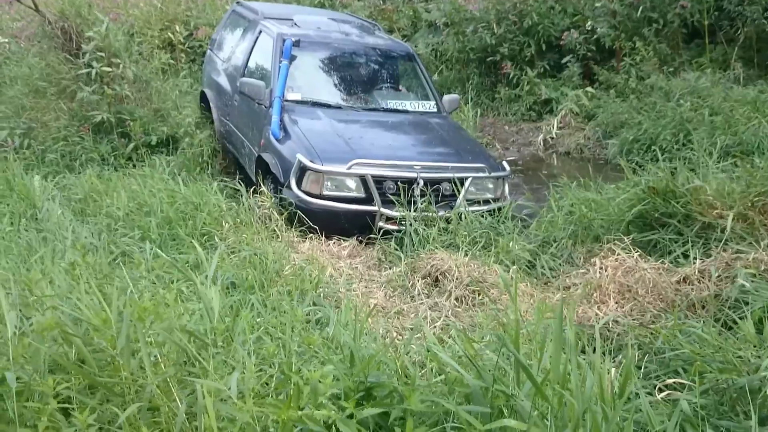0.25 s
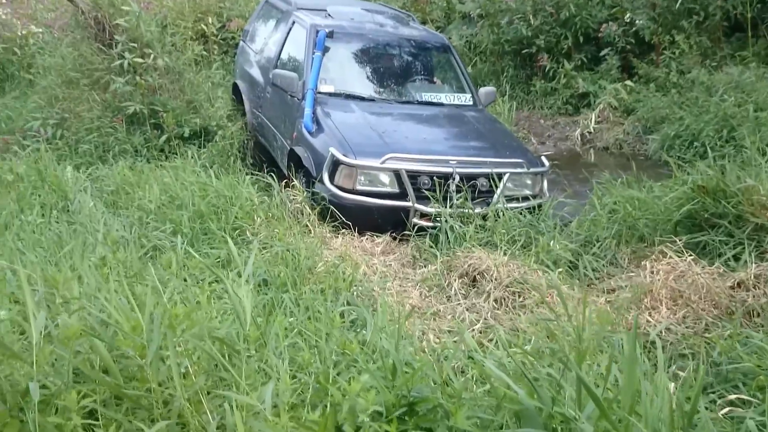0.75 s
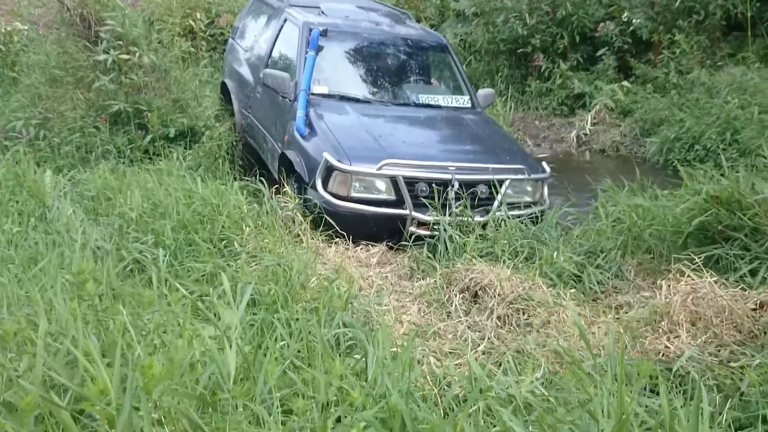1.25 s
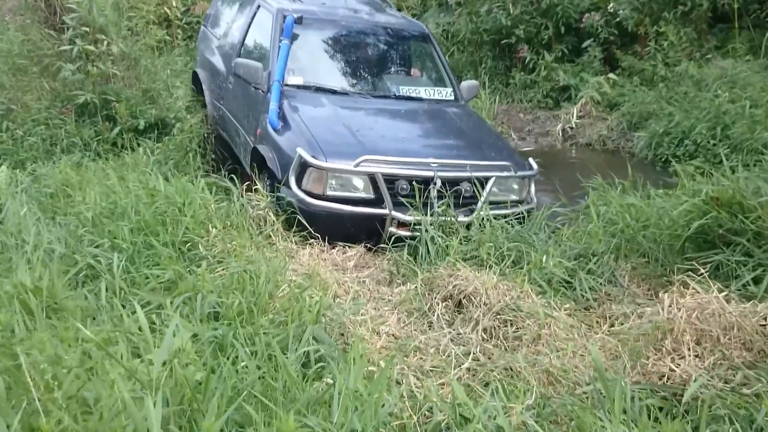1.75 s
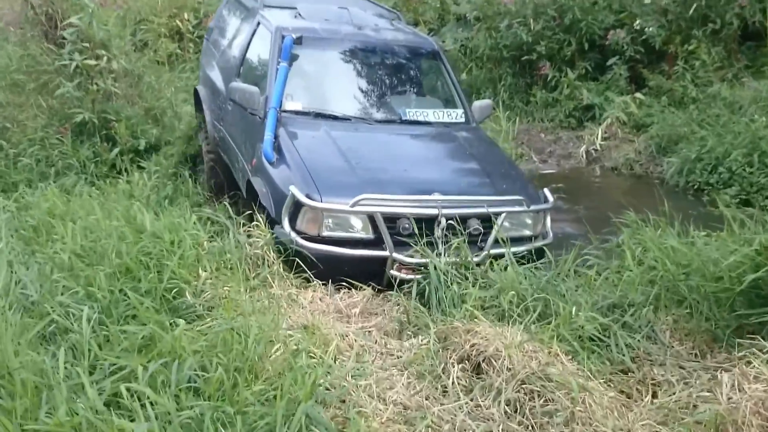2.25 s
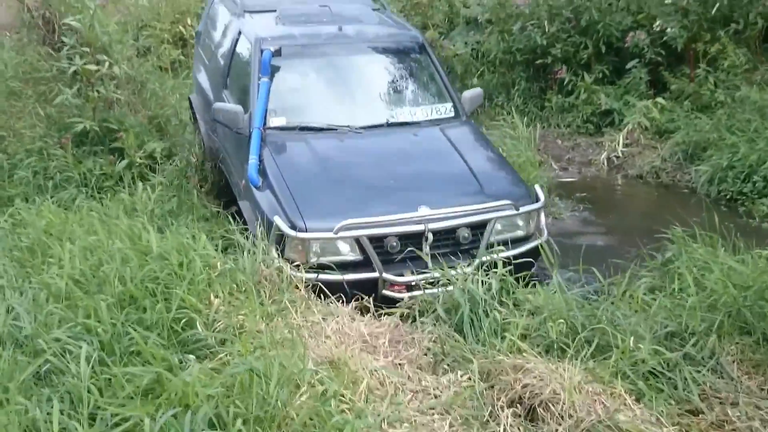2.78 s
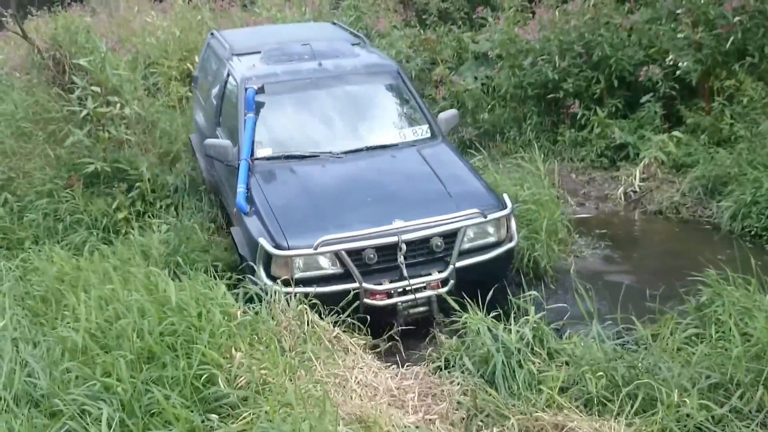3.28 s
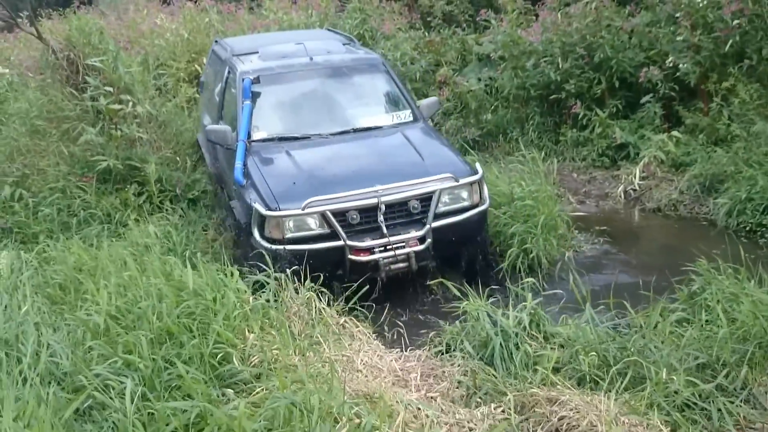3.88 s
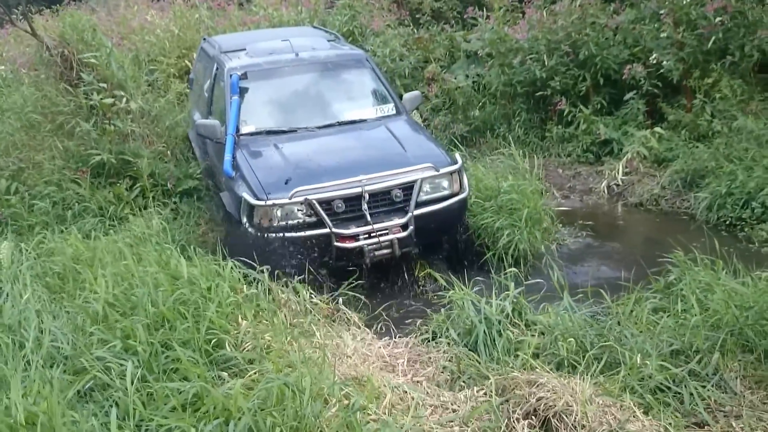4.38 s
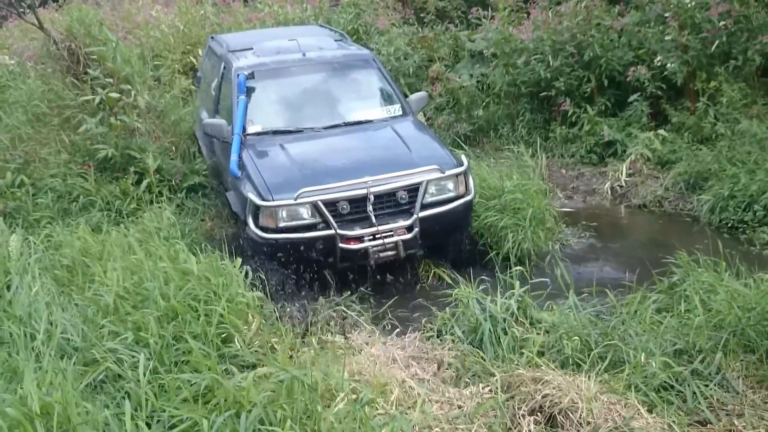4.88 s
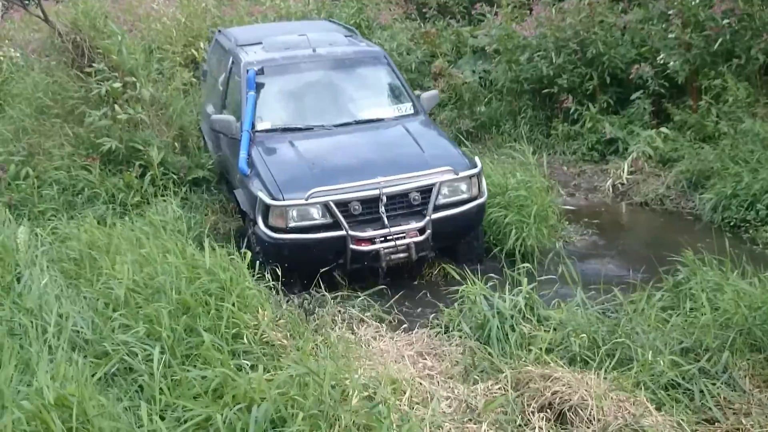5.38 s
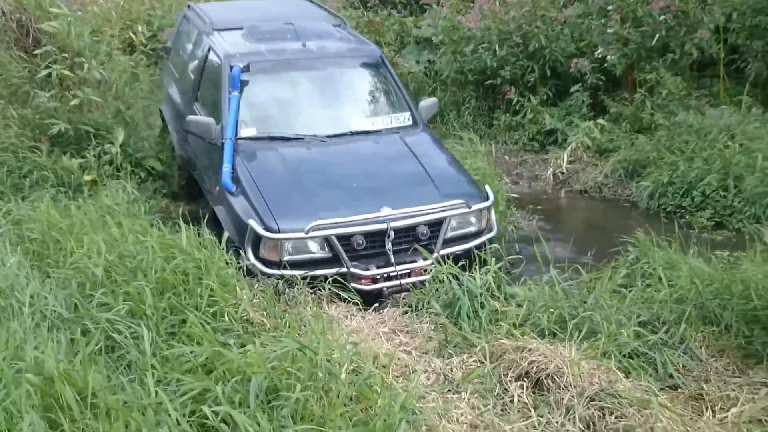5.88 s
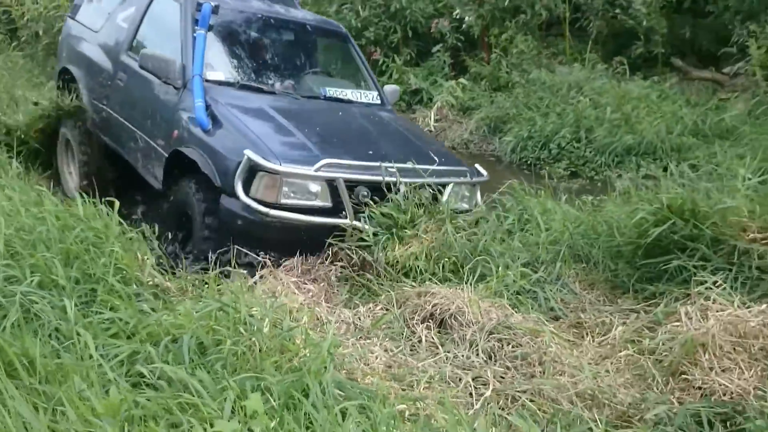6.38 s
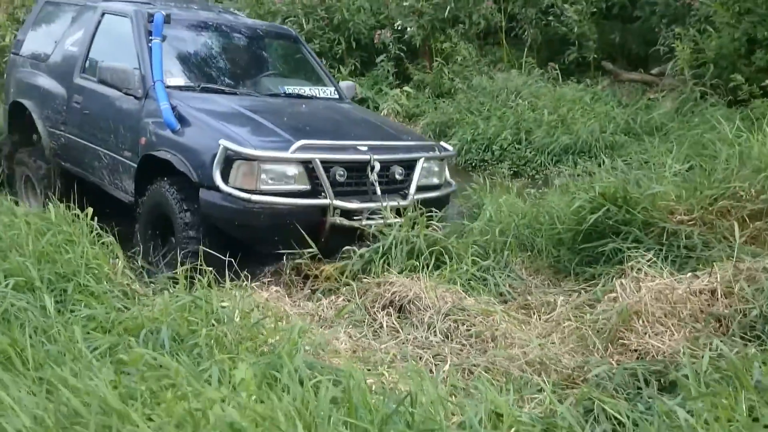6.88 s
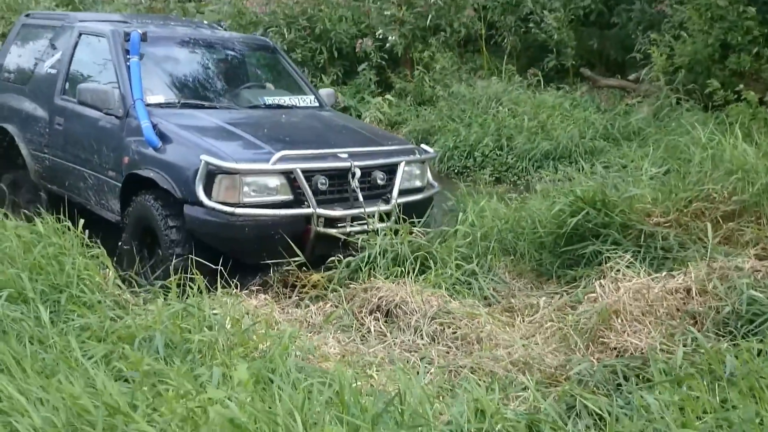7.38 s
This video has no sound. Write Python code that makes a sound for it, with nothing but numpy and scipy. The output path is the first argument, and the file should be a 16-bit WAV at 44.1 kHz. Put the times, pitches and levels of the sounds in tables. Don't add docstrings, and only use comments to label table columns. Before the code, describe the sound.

In tall grass by a muddy ditch, small stereo microphones catch a car struggling free. Its burbling engine drops to idle, pulls away with deep intake growl, surges to a rough roar, sags and rises again without stopping. Fan hum and a steady belt whine join valve clatter under the bonnet. Bursts of watery hiss and mud spatter come from the wheels, with a heavy bump midway, small clicks and brief low wind gusts.

```python
import sys
import numpy as np
from scipy import signal
from scipy.io import wavfile
from scipy.ndimage import uniform_filter1d

SR = 44100
rng = np.random.default_rng(int(sys.argv[2]) if len(sys.argv) > 2 else 0)


def store_pcm(level_fs):
    pcm = np.round(np.clip(level_fs, -1, 1) * 32767).astype(np.int16)
    wavfile.write(sys.argv[1], SR, np.atleast_2d(pcm).T)


def natural_amplitude(level_db):
    exponent = np.asarray(level_db, float) / 20
    return 10 ** exponent


N = 337365
T = np.arange(N) / SR

# (time [s], firing rate [Hz])
ENGINE = [(0.0, 67.7), (0.55, 49.36), (0.85, 40.68), (1.23, 32.14), (1.6, 29.96), (2.28, 55.65),
          (2.56, 59.27), (2.88, 58.75), (4.05, 121.8), (4.2, 136.5), (4.39, 106.8), (4.67, 83.46),
          (5.09, 66.96), (5.35, 88.33), (5.95, 88.4), (6.24, 108.8), (6.6, 111.6), (7.65, 161)]
# (time [s], throttle as firing tone [dB], bark of the overtones [dB], bay roar [dB])
LOAD = [(0.0, -40.5, 4.5, -45), (.3, -37.5, -4, -51), (.85, -39.5, -7.5, -59), (1.2, -52.5, 4, -65),
        (1.6, -53, 2.5, -63.5), (1.8, -38.5, -0.5, -53), (2.06, -28.5, -2.3, -48.5), (2.3, -31, -3.5, -48),
        (2.95, -33, -1, -43), (3.94, -36, 1.5, -31.5), (4.28, -41, -2, -31), (4.42, -36, -1, -33),
        (5.1, -40.5, -2, -44), (5.5, -35, -5, -36.5), (6.0, -35.5, -2, -37), (6.9, -30, -3.5, -31.5),
        (7.35, -22, -9, -29.5), (7.65, -26.5, 5.5, -27.5)]
# (time [s], nearness [0-1])
NEARNESS = [(0, 0.17), (1.5, 0), (2.4, 0.57), (3.3, 1), (7.65, 0.72)]
# (frequency [Hz], likeness [0-1], left-right level [dB], left's extra phase lead [rad])
PORTS = [(24.9, 0.14, -23, -0.74), (60, 0.75, -14, 0.83), (220, 0.98, -1, 0.23), (440, .75, -5.5, 0.66),
         (616, 0.94, 5.5, -0.031), (925, 1, -5, 0.4), (1160, 0.83, 4.5, 0.81), (2340, 0.93, 3, 0.4),
         (2660, 0.55, -3.5, -0.83), (2830, 0.03, -6, -0.5), (4220, 0.47, -2.5, 0.18),
         (5500, 0.2, 10.5, 0.88), (6800, 0.2, 19.5, 0.67), (14600, 0, 9, 0.23)]
MID_ROAR_DB, MID_THROTTLE_DB = -40, -34


def evened(x):
    return x / np.sqrt(np.mean(np.abs(x) ** 2) + 1e-20)


def read(points, hz, index=1):
    points = np.array(points)
    return np.interp(np.log(hz + 1), np.log(points[:, 0] + 1), points[:, index])


def column(rows, index, t=T, **ends):
    rows = np.array(rows)
    return np.interp(t, rows[:, 0], rows[:, index], **ends)


def to_db(gain):
    return 20 * np.log10(gain + 1e-9)


def with_roar(db, share):
    return db + share * (column(LOAD, index=3) - MID_ROAR_DB)


def drift(rate_hz):
    knots = evened(uniform_filter1d(rng.standard_normal(4000), size=3))
    return np.interp(T * rate_hz * 3, np.arange(4000), knots)


def burst(start, held, db, rise_db_per_s, fall_db_per_s):
    t = T[::32]
    before = np.maximum(start - t, 0)
    after = np.maximum(t - start - held, 0)
    gain = natural_amplitude(db - rise_db_per_s * before - fall_db_per_s * after)
    return np.repeat(gain, 32)[:N]


def lead(hz, t):
    # (time [s], left's lead [s])
    left_lead = [(0, 0.00002), (2, 0.000034), (4, 0.000085), (7.65, 0.0001)]
    return 2 * np.pi * hz * column(left_lead, index=1, t=t) + read(PORTS, hz, index=3)


def tone(hz, level_db, wobble_db, wobble_hz, stray, lag=0):
    angle = 2 * np.pi * (np.cumsum(hz) / SR + stray * drift(wobble_hz)) - lag
    gap = np.repeat(lead(hz[::64], T[::64]), 64)[:N]
    gain = np.sqrt(2) * natural_amplitude(level_db + wobble_db * drift(wobble_hz))
    return gain * np.cos([angle, angle - gap])


def haze(colour, level_db, size, patchy_db, flicker_db, tilt=1, far=None):
    hop = size // 4
    frames, hz = N // hop + 5, np.fft.rfftfreq(size, 1 / SR)[:, None]
    t = np.arange(frames) * hop / SR
    a, b, c, d, patches = rng.standard_normal((frames, len(hz), 5)).T
    patches = uniform_filter1d(patches, size=6, axis=0)
    patches = evened(uniform_filter1d(patches, size=8, axis=1))
    flicker = evened(uniform_filter1d(rng.standard_normal(frames), size=4))
    same = np.clip(read(PORTS, hz), 0, 1)
    left = a + 1j * b
    right = same * left * np.exp(-1j * lead(hz, t)) + np.sqrt(1 - same ** 2) * (c + 1j * d)
    side = natural_amplitude(tilt * read(PORTS, hz, index=2) / 2)
    near = np.clip(column(NEARNESS, index=1, t=t), 0, 1)
    colour_db = near * read(colour, hz) + (1 - near) * read(far or colour, hz)
    gain = natural_amplitude(colour_db + patchy_db * patches + flicker_db * flicker)
    z = np.array([left * side, right / side]) * gain / (side + 1 / side)
    noise = signal.istft(z, nperseg=size, noverlap=size - hop)[1][:, :N]
    return natural_amplitude(level_db) * evened(noise)


def firing_orders():
    # (frequency [Hz], level [dB])
    duct = [(55, -2.2), (105, 2), (150, 3), (195, 7.5), (240, -2.2), (275, -13), (350, -7.5), (470, -11.5)]
    # (frequency [Hz], level [dB])
    pipe = [(30, -22), (80, -17), (120, 5.5), (200, -5), (250, -3.5), (340, -8), (450, -18), (550, -16),
            (700, -20)]
    # (multiple of the firing rate, level from the fourth overtone [dB])
    upper = [(4, 0.5), (5, -6.5), (6, -7.5), (7, -22)]
    # (multiple of the firing rate, level from the uneven-cylinder layer [dB])
    halves = [(.5, -13), (1.5, -1.5), (2.5, -0.5), (3.5, -7.5), (4.5, -7.5)]
    hz, throttle = column(ENGINE, index=1), column(LOAD, index=1)
    bark = throttle + column(LOAD, index=2)
    uneven = with_roar(-47, 0.69) + 0.45 * np.maximum(hz - 132, 0)
    slowing = np.clip(-uniform_filter1d(np.gradient(np.log(hz)) * SR, size=4000), 0, 1)
    overrun_db = -14 * slowing
    lag = 2.0
    out = tone(hz, throttle + read(duct, hz), 1.2, 12, 0.008, lag)
    out += tone(2 * hz, bark - 6.5 + read(duct, 2 * hz), 2.5, 7, 0.045, lag)
    out += tone(3 * hz, bark - 8 + read(duct, 3 * hz), 2, 7, 0.06, lag)
    for k, db in upper:
        out += tone(k * hz, bark - 11 + db + overrun_db + read(duct, k * hz), 3, 8, 0.045, lag)
    for k, db in halves:
        out += tone(k * hz, uneven + db + read(pipe, k * hz), 2, 5, 0.028, lag)
    off = (4 * hz - 555) / 50
    ring_db = column(LOAD, index=3) - 10 - 10 * np.log10(1 + off ** 4)
    return out + tone(4 * hz, ring_db, 2, 8, 0.03)


def burble():
    # (frequency [Hz], level per Hz [dB])
    near_colour = [(15, -30), (25, 1), (48, -15.5), (97, 5), (188, 3.5), (243, 1), (393, -9), (476, -24),
                   (520, -22.5), (680, -37), (1140, -120)]
    far_colour = [(15, -36), (25, -1), (59, -20), (181, -6.5), (234, -4.5), (321, -22.5), (414, -19.5),
                  (520, -27), (680, -61), (1140, -120)]
    hz, throttle = column(ENGINE, index=1), column(LOAD, index=1)
    puffs = np.exp(np.clip(35 / hz, 0, 1) * np.cos(2 * np.pi * np.cumsum(hz) / SR))
    burble_db = with_roar(-26.5, 0.45) + 0.29 * (throttle - MID_THROTTLE_DB)
    noise = haze(near_colour, burble_db - 9.5, size=2048, patchy_db=-1.5, flicker_db=0.5, tilt=0,
                 far=far_colour)
    return noise * evened(puffs)


def whine(start, held, hz, glide_hz_per_s, db):
    gain = burst(start, held, db, 85, 85)
    pitch = hz + glide_hz_per_s * np.clip(T - start, -0.4, held + 0.4)
    return gain * tone(pitch, 0, 3.5, 60, 0.12 + hz / 15000)


def thrown(index):
    # (start [s], held [s], spray [dB], coarse mud [dB], onset [dB/s])
    splashes = [(.72, .3, -63.5, -80, 150), (1.17, .1, -47.5, -70, 61), (1.601, 0.25, -39.5, -56, 148),
                (2.1, 0.22, -49, -51.5, 60), (2.36, .08, -44, -49, 120), (2.52, 0.19, -39.5, -43.5, 64),
                (2.9, .2, -49, -48, 53), (3.6, 0.059, -48, -40.5, 68), (3.8, .66, -58.5, -47.5, 56),
                (4.9, 0.13, -47.5, -43.5, 27), (5.16, .02, -53, -63, 84), (5.56, 0.049, -46, -43, 23),
                (6.08, 0.096, -43.5, -40, 50), (6.58, 0.082, -46, -42, 24), (6.8, 0.07, -44.5, -65, 63),
                (7.05, 0.56, -46.5, -48, 40)]
    power = sum(burst(row[0], row[1], row[index], row[4], 75) ** 2 for row in splashes)
    return power ** 0.5


def engine_bay():
    # (frequency [Hz], level per Hz [dB])
    near_roar = [(330, -14), (420, -7.5), (490, -27), (580, -9), (780, 0), (950, -1), (1140, -13.5),
                 (1480, -8.5), (1660, -5.5), (1850, -13), (2550, -13), (2850, -22), (3800, -16.5),
                 (5200, -38)]
    far_roar = [(260, -38), (350, -18.5), (640, 1), (800, -2.5), (1000, -7), (1420, -2), (1760, -8.5),
                (2200, -1.5), (2480, -13.5), (2760, -7), (3050, -16), (5200, -39)]
    # (frequency [Hz], level per Hz [dB])
    near_clatter = [(1940, -7.5), (3300, -6), (3600, -7.5), (3950, -3.5), (5910, -4), (6330, -4.5),
                    (7770, -18.5), (9000, -20.5), (11700, -26.5), (19800, -120)]
    far_clatter = [(1940, -8.5), (3000, -12), (4300, -8.5), (5200, -4), (5750, -3.5), (6500, -9.5),
                   (8000, -19), (13200, -22.5), (14100, -50)]
    # (start [s], held [s], pitch [Hz], glide [Hz/s], level [dB])
    whines = [(.15, 0.052, 2290, -750, -51.5), (2.44, .15, 2190, 300.5, -51), (4.4, 0.18, 2500, 39, -53),
              (.9, .08, 1285, -500, -66), (1.1, .5, 825, -170, -64), (3.05, 0.059, 2565, 898.5, -53),
              (6.15, 1.8, 1651, 15, -44.5), (1.7, .45, 2125, 88, -61.5), (.4, .3, 2080, -100, -61)]
    hz = column(ENGINE, index=1)
    beat = 1 + np.clip(9 / hz, 0, 1) * np.cos(2 * np.pi * np.cumsum(hz) / SR)
    roar = haze(near_roar, column(LOAD, index=3) + 1.7, size=1024, patchy_db=1.48, flicker_db=0.5,
                far=far_roar)
    clatter_db = to_db(np.hypot(natural_amplitude(with_roar(-42.5, 0.99)), thrown(index=3)))
    clatter = haze(near_clatter, clatter_db + 3.0, size=512, patchy_db=1.24, flicker_db=0.5,
                   far=far_clatter)
    voices = whines + 2 * whines[:2]
    return beat * (roar + clatter) + sum(whine(*row) for row in voices)


def spray():
    # (frequency [Hz], level per Hz [dB])
    near_hiss = [(1500, -10), (2500, -7), (3000, -3), (3900, -10), (6300, -6), (7900, -5.5), (9500, -5.5),
                 (11200, -7), (13500, -0.5), (14900, -5), (16500, -5.5)]
    far_hiss = [(1500, -13), (3000, -6.5), (3900, -11), (6300, -8), (8100, -2), (9800, -6.5), (11200, -9),
                (13500, -5.5), (16500, -10)]
    drops = natural_amplitude(2.1 * np.minimum(rng.exponential(1, N), 5))
    drops = drops * (rng.random(N) < 150 / SR)
    grain = 1 + 0.17 * signal.oaconvolve(drops, np.exp(-np.arange(200) / 40))[:N]
    mist_db = with_roar(-53.5, 1) - 14 * (1 - column(NEARNESS, index=1))
    hiss_db = to_db(np.hypot(natural_amplitude(mist_db), thrown(index=2)))
    return grain * haze(near_hiss, hiss_db + 1.43, size=256, patchy_db=0.8, flicker_db=0.64, tilt=0.44,
                        far=far_hiss)


def wind():
    # (frequency [Hz], level per Hz [dB])
    rumble = [(2, -12), (10, 1), (25, -11), (60, -11.5), (150, -14), (300, -86)]
    # (start [s], held [s], level [dB])
    gusts = [(0.0, 0.025, -35.5), (.23, .5, -42), (1.87, 0.051, -30), (2.76, .05, -33.5), (3.3, 0.11, -37),
             (3.57, 0.035, -41), (3.87, 0.052, -31.5), (5.0, .08, -34), (5.95, .05, -38),
             (6.65, .04, -30.5), (6.9, 0.092, -44), (7.58, 0.048, -44)]
    gain = natural_amplitude(-46) + sum(burst(*row, 79, 86) for row in gusts)
    return haze(rumble, to_db(gain), size=4096, patchy_db=1.5, flicker_db=1.0, tilt=1.0)


def ticks():
    # (time [s], level [dB], left-right level [dB])
    stalks = [(.0448, -51, 7.5), (0.6937, -24, 21), (0.963, -46, 2.5), (2.0518, -39, -4), (3.1124, -32, 15),
              (5.1427, -33, 5), (6.8054, -25, 4.5), (7.0708, -27, 6)]
    out, t = np.zeros((2, N + 8000)), np.arange(400) / SR
    bright = signal.butter(2, [5000, 14500], "band", fs=SR)
    body = 0.39 * np.sin(2 * np.pi * 900 * t) * np.exp(-t / 0.00091)
    for s, db, pan in stalks:
        snap = rng.standard_normal(400) * np.exp(-t / 0.00026)
        tick = signal.lfilter(*bright, snap) + 0.12 * snap
        tick = natural_amplitude([[0], [-pan]]) * tick / abs(tick).max()
        out[:, round(s * SR):][:, :400] += natural_amplitude(db) * (tick + body)
    return out[:, :N]


def thumps():
    # (time [s], level [dB], pitch [Hz])
    blows = [(0.699, -32, 187), (3.584, -27, 60), (3.913, -18, 74.9), (3.912, -29, 440), (3.93, -26, 590),
             (3.925, -23, 155), (3.952, -23, 135), (5.153, -22, 134), (5.445, -35, 2648),
             (5.468, -35, 1800)]
    out, t = np.zeros((2, N + 8000)), np.arange(8000) / SR
    for s, db, hz in blows:
        thump = np.sin(2 * np.pi * hz * t * (1 - 3 * t)) * np.exp(-t / 0.0088)
        out[:, round(s * SR):][:, :8000] -= natural_amplitude(db) * thump
    return out[:, :N]


def fan():
    # (time [s], tone [Hz], level [dB])
    blades = [(2.9, 178, -48.5), (3.42, 255.4, -34.5), (3.86, 308.2, -30.5), (4.2, 340, -38),
              (4.38, 317, -32), (4.8, 228.5, -49), (5.05, 198.1, -51), (5.36, 266.3, -37.5),
              (5.95, 261, -36), (6.3, 308.6, -44.5), (6.6, 303.7, -40.5), (6.9, 329.7, -34),
              (7.15, 348.9, -49.5), (7.65, 399.6, -42)]
    blade_db = column(blades, index=2, left=-150, right=-150)
    return tone(column(blades, index=1), blade_db, 1.1, 11, 0.039)


def bump():
    age = np.maximum(T - 3.9, 0)
    dull = signal.butter(4, [50, 500], "band", fs=SR, output="sos")
    shudder = evened(signal.sosfilt(dull, rng.standard_normal(N)))
    return natural_amplitude(-22) * np.minimum(age / 0.006, 1) * np.exp(-age / 0.05) * shudder


def scene():
    bass_pan_db = -2.5
    engine = firing_orders() + burble() + fan()
    engine = engine * natural_amplitude([[bass_pan_db / 2], [-bass_pan_db / 2]])
    return engine + engine_bay() + spray() + wind() + ticks() + thumps() + bump()


def low_pass(x):
    return signal.sosfilt(signal.butter(12, 15490, fs=SR, output="sos"), x)


def record(dry):
    edge = signal.firwin(255, 15380, fs=SR)[None]
    mix = signal.oaconvolve(dry, edge, "same")
    return low_pass(mix)


dry = scene()
out = record(dry)
store_pcm(out)
```